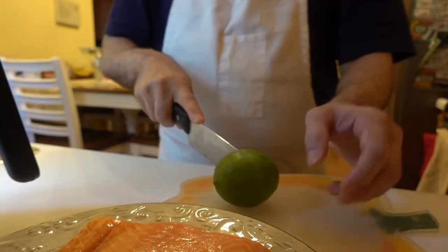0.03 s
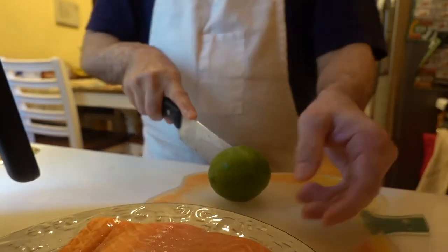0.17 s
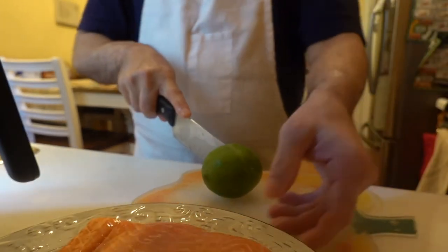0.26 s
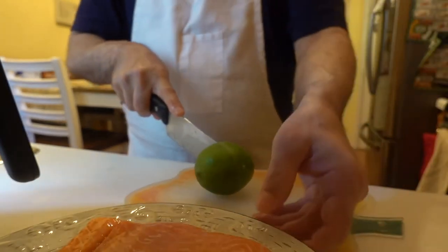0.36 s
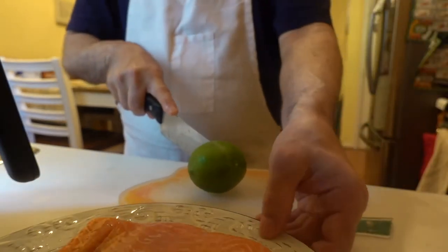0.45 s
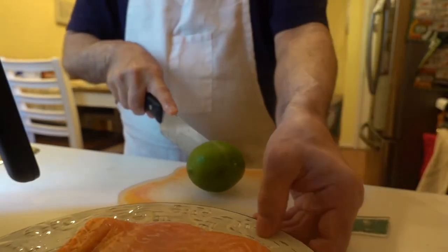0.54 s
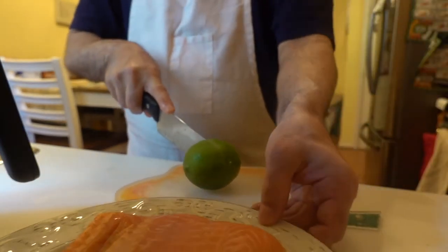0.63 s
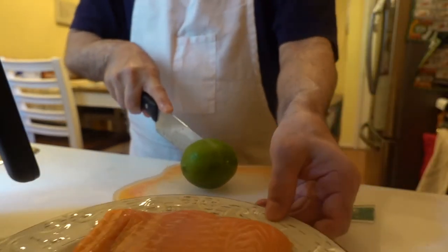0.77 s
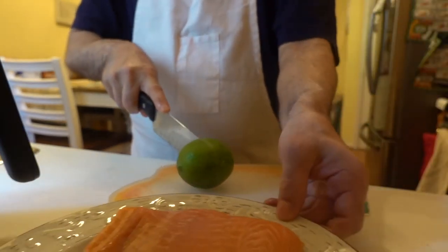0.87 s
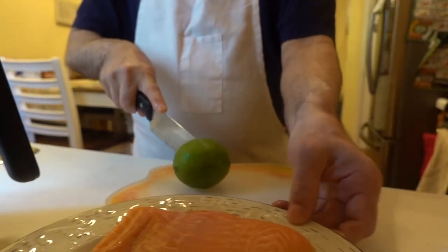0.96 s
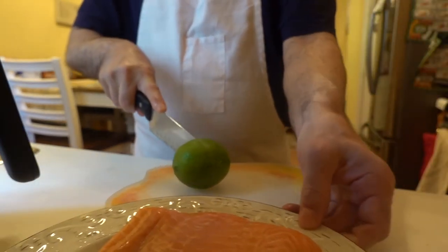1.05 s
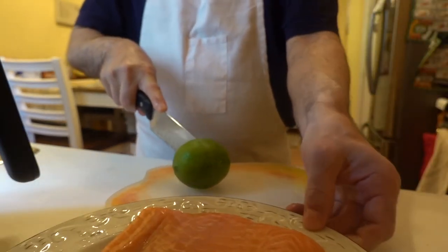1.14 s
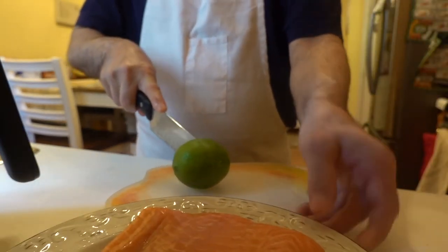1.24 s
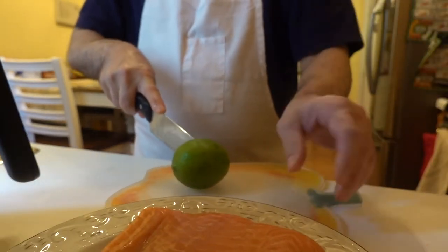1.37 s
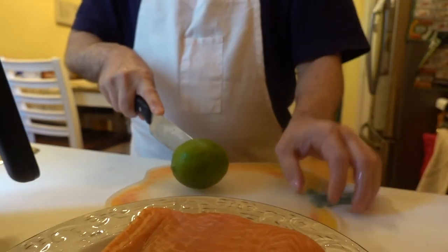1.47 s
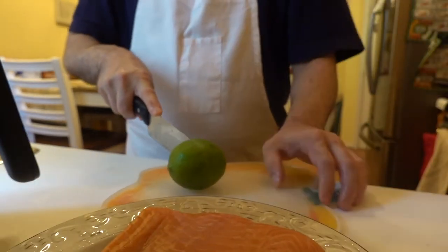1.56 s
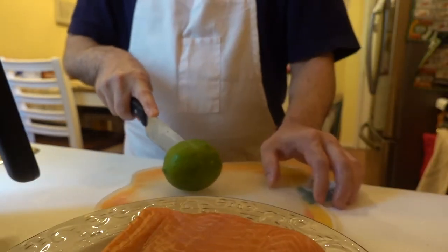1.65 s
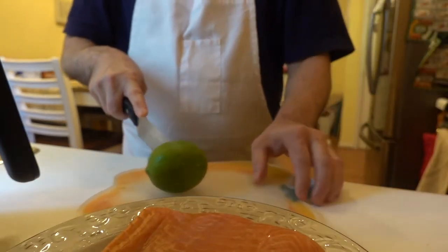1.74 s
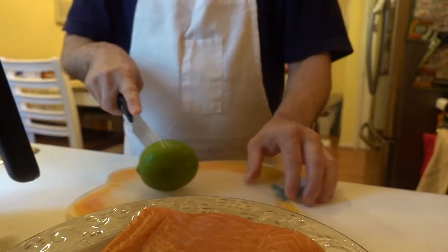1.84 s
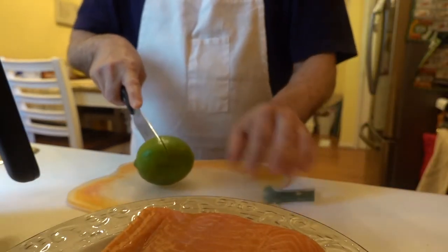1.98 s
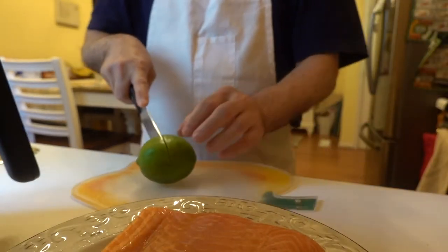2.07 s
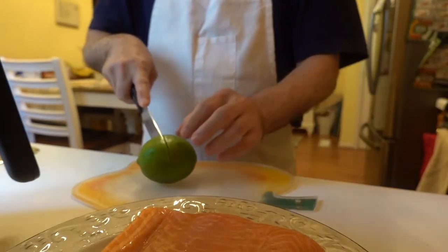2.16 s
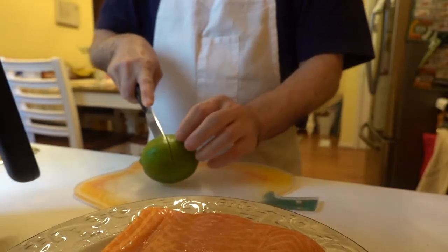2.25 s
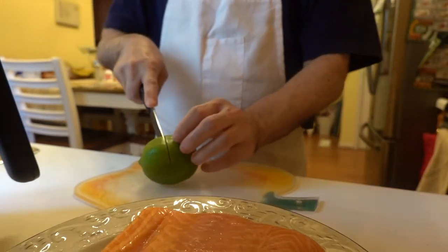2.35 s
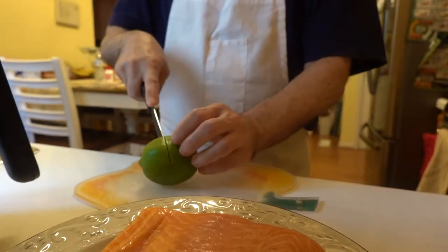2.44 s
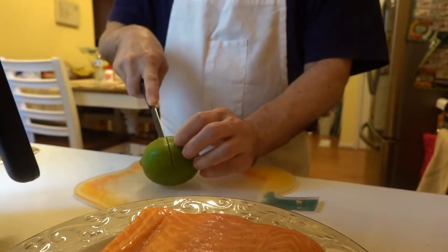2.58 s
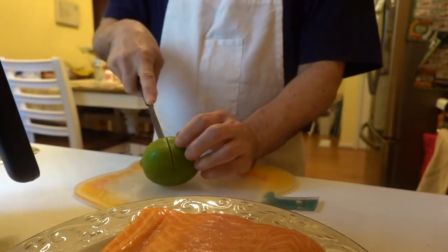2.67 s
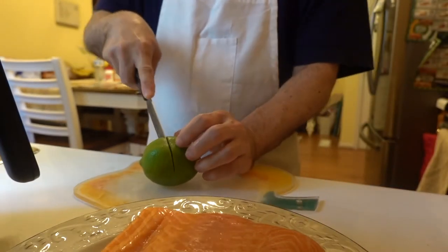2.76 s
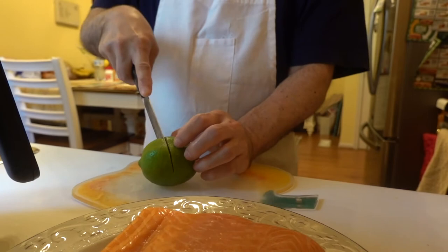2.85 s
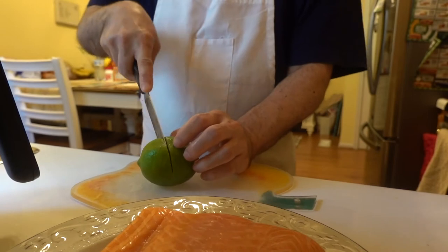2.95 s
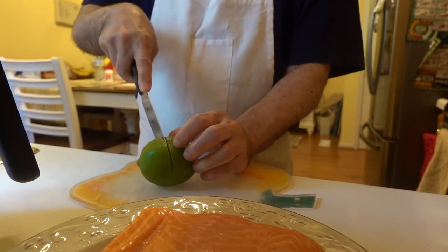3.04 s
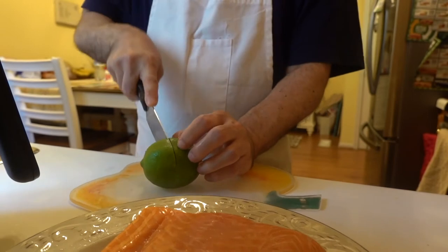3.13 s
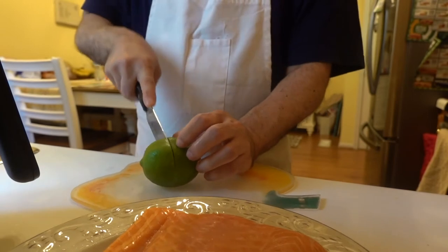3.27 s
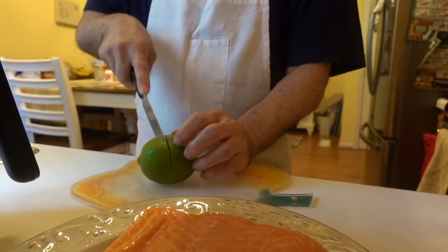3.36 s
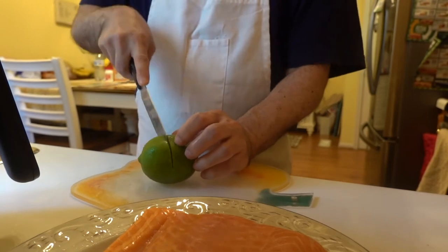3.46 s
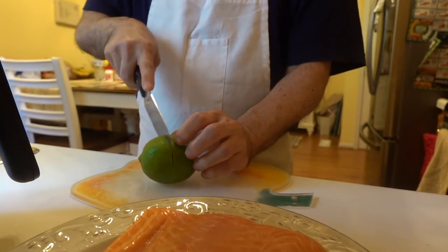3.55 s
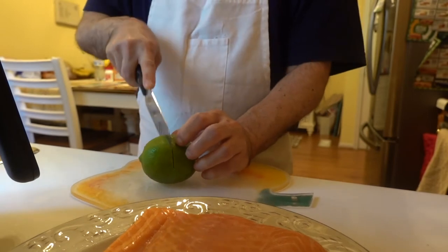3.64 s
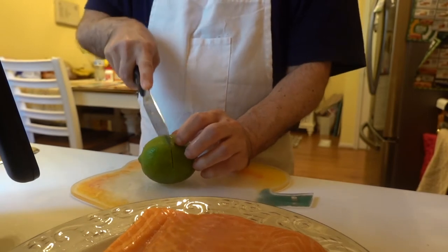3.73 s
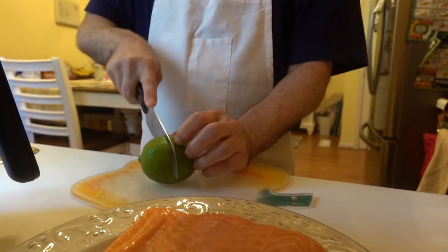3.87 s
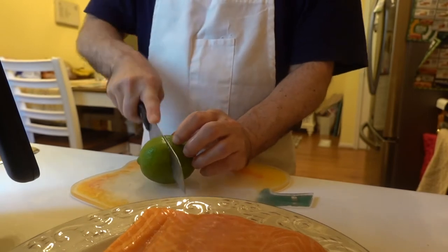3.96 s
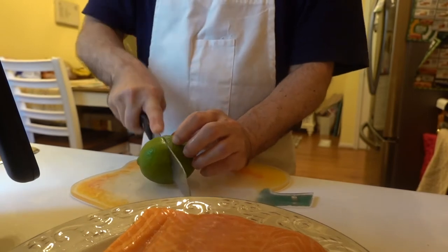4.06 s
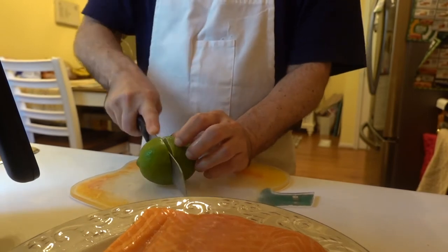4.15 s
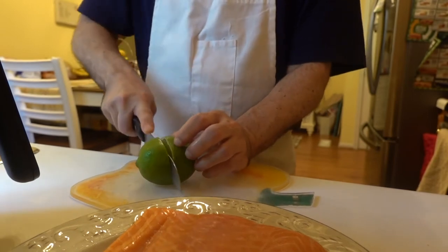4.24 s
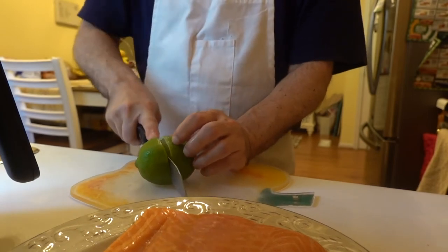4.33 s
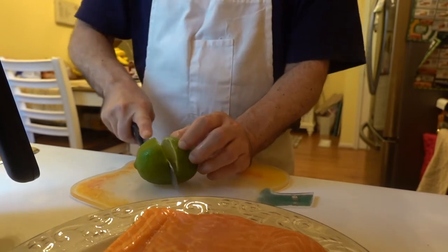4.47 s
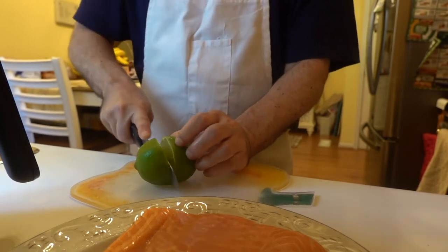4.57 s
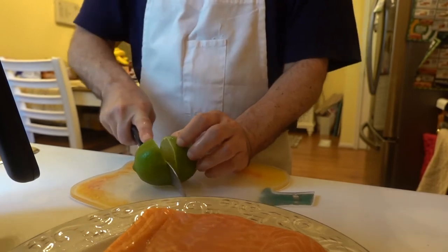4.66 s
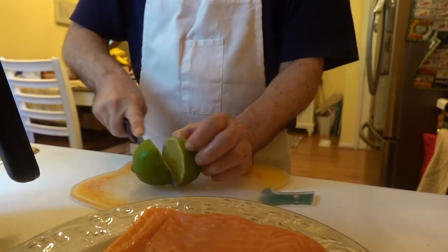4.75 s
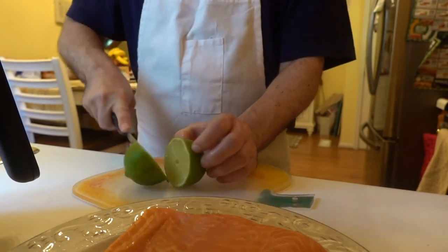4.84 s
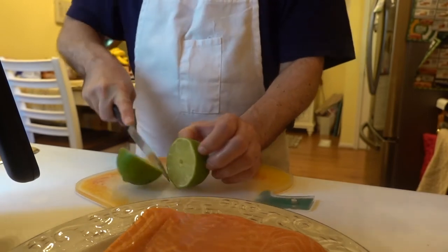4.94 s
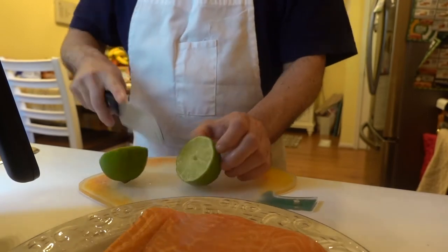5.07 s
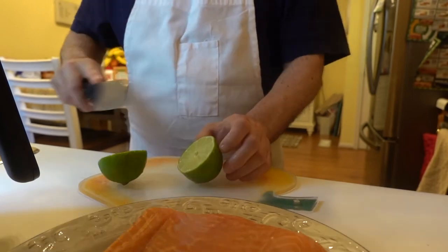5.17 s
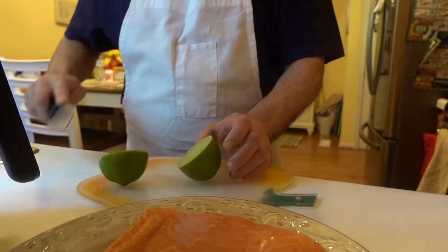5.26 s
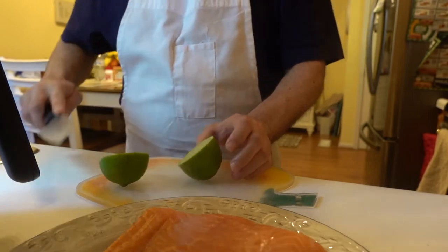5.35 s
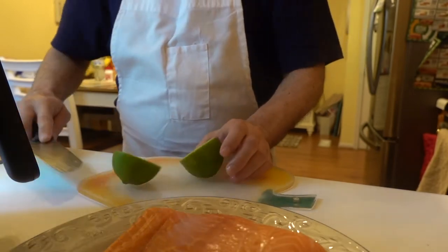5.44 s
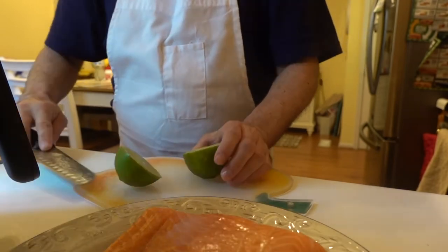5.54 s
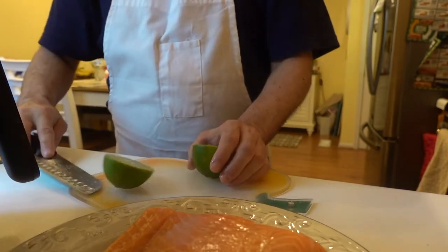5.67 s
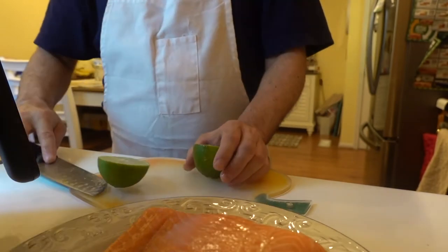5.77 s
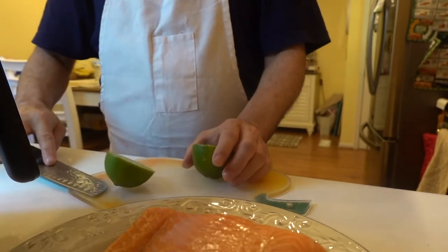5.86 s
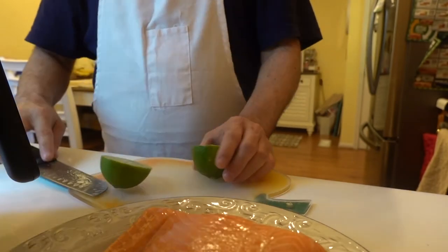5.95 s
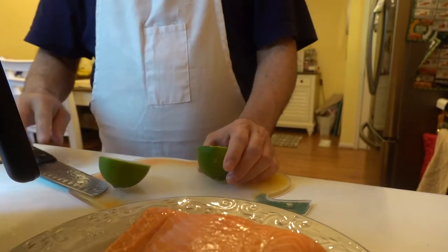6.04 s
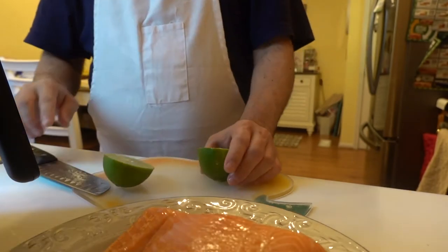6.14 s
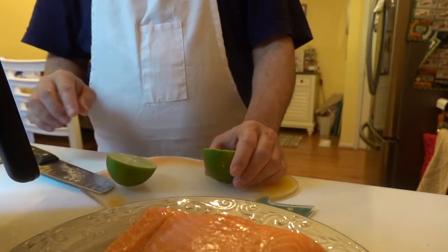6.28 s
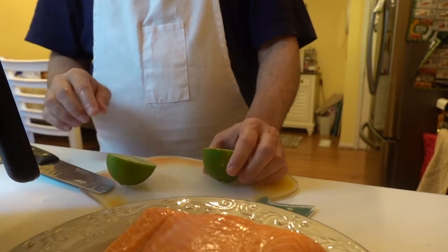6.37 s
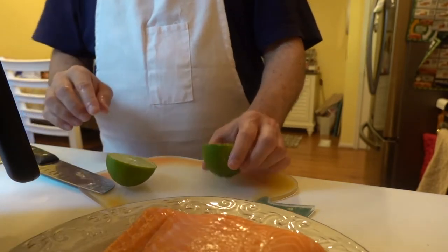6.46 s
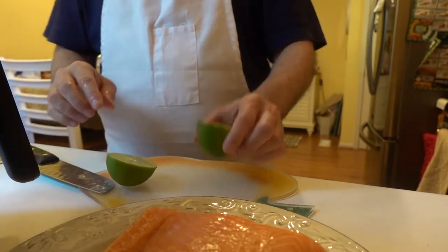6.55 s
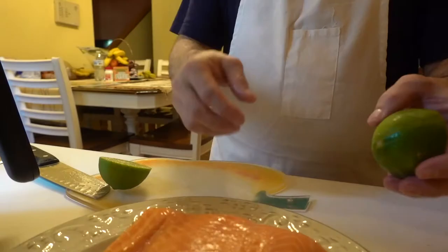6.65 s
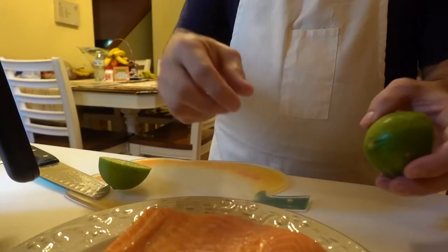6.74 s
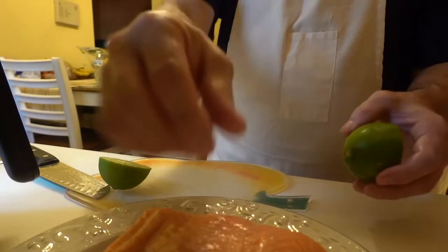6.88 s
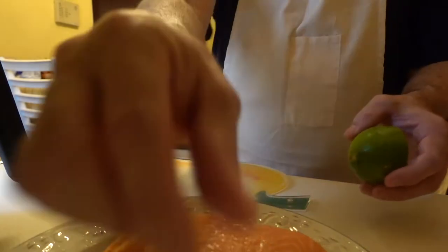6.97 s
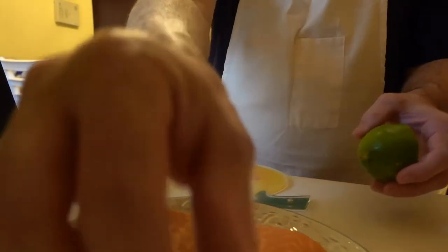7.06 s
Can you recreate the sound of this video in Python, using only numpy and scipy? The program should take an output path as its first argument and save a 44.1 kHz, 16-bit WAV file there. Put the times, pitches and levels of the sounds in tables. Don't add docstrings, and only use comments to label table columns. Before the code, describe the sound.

A quiet kitchen heard very close in stereo, with low appliance rumble, faint hiss and a short lively echo. Around 0.3 s a soft brush begins; from 0.55 to 1.15 s a ceramic plate scrapes over the counter, loudest near 0.77 with a click, and thuds down at 1.0. Small ticks at 1.3, a soft tap at 1.55, fingers brushing around 1.9, a light knock at 2.13. Then near quiet with low counter creaking-weight rumbles until a strong woody knock at 3.35 and a faint settling rub. From 4.1 to 4.95 s short wet rasping strokes cut the lime, with spitting juice and snaps; hard knocks land at 4.13, 4.37, 4.58 and, sharpest, 4.71. A hollow squelch follows at 4.85, and halves tumble in soft thumps at 5.03. A light knock at 5.66, a steely ping at 5.71, then slide and clatter until 5.92. Quiet rumble ends it at 7 s.

```python
import sys
import numpy as np
from scipy import signal
from scipy.fft import rfft, irfft, next_fast_len
from scipy.io import wavfile
from scipy.ndimage import map_coordinates

SR = 44100
rng = np.random.default_rng(int(sys.argv[2]) if len(sys.argv) > 2 else 0)


def generate_wav(sig):
    pcm = np.round(np.clip(np.atleast_2d(sig).T, -1, 1) * 32767).astype(np.int16)
    wavfile.write(sys.argv[1], SR, pcm)


def boost_factor(decibels):
    exponent = np.asarray(decibels, float) / 20
    return 10 ** exponent


N = 313551

# f/Hz, left-right likeness
NEAR_ALIKE = [(100, 1), (300, 0.98), (700, 0.76), (1600, 0.92), (3200, 0.76), (6000, 0.09), (15000, 0.052)]


def unit(x):
    return x / np.sqrt(np.mean(x ** 2) + 1e-20)


def along(points, hz):
    f, v = np.transpose(points)
    return np.interp(np.log(hz + 1), np.log(f + 1), v)


def strokes(rows, power=1.72):
    t, gains = np.arange(N) / SR, 0
    for s, rise, fall, db, *rest in rows:
        away = np.where(t < s, (s - t) / rise, (t - s) / fall)
        layers = np.add(db, [[c] for c in [0, *rest]])
        fade_db = 26.5 * np.minimum(away, 9) ** power
        gains = gains + boost_factor(layers) * boost_factor(-fade_db)
    return gains


def wobble(rate):
    knots = rng.standard_normal(int(N * rate / SR) + 4)
    return map_coordinates(knots, [np.arange(N) * rate / SR])


def filtered(x, response):
    m = next_fast_len(x.shape[-1] + 8192)
    spectrum = rfft(x, m) * response(np.fft.rfftfreq(m, 1 / SR))
    return irfft(spectrum, m)[..., :x.shape[-1]]


def peaks(modes):
    def response(f):
        total = 0
        for k, (centre, width, db) in enumerate(modes):
            damping = 1j * f * width
            total = total + (-1) ** k * boost_factor(db) * damping / (centre * centre - f * f + damping)
        return total
    return response


def colour(spectrum):
    return lambda f: boost_factor(along(spectrum, f))


def ports(mid, side, alike, response=np.ones_like):
    turn = lambda f: np.arccos(np.clip(along(alike, f), 0, 1)) / 2
    mix = lambda f: response(f) * [np.cos(turn(f)), np.sin(turn(f))]
    mid, side = filtered(np.array([mid, side]), mix)
    return np.array([mid + side, mid - side])


def friction(response, alike, grain_db, rough_db):
    grains = boost_factor(grain_db * wobble(900) + rough_db * wobble(45))
    return unit(ports(*grains * rng.standard_normal((2, N)), alike, response))


def ring(spectrum, t, low_hz, high_hz, t60, count, smear=1.67):
    place, size, life, phase = rng.random((4, count, 1))
    hz = low_hz + (high_hz - low_hz) * (np.arange(count)[:, None] + place) / count
    level = along(spectrum, hz) + 5 * size - 60 * t / (t60 * (1.39 + 0.87 * life))
    x = np.sum(boost_factor(level) * np.sin(2 * np.pi * hz * t + smear * phase), axis=0)
    return x / np.abs(x).max()


def burst(t, hz, width, t60):
    band = peaks([(hz, width, 0)])
    x = filtered(boost_factor(-60 * t / t60) * rng.standard_normal(len(t)), lambda f: band(f) ** 2)
    return x / np.abs(x).max()


def add(track, s, x):
    part = track[round(s * SR):][:len(x)]
    part += x[:len(part)]


def background():
    # t/s, level/dB
    rumble_level = [(0.0, -62.5), (0.89, -52), (1.29, -56), (2.0, -58.5), (2.14, -56.5), (2.95, -59),
                    (3.36, -50), (3.56, -57), (3.9, -57.5), (4.02, -48.5), (4.24, -46.5), (5.7, -57),
                    (5.84, -54.5), (6.2, -56), (6.69, -60), (7.11, -57)]
    # t/s, rise/s, fall/s, level/dB
    deep_swells = [
        (.25, .15, 0.17, -69),
        (1.38, 0.055, 0.12, -63),
        (1.9, .2, 0.13, -62),
        (2.65, .12, 0.14, -52),
        (3.28, .08, 0.073, -57),
        (4.1, .15, .2, -62),
        (4.56, 0.11, 0.23, -52.5),
        (5.3, .2, 0.39, -62.5),
        (6.63, 0.09, 0.12, -64),
        (6.99, 0.088, 0.14, -58),
    ]
    # f/Hz, density/dB
    hum_spectrum = [(32, -40), (55, -13), (97, -1), (124, -13), (210, -10.5), (293, -16.5), (321, -25),
                    (427, -24.5), (500, -37), (650, -62.5), (1100, -120)]
    # f/Hz, density/dB
    hiss_spectrum = [(180, -26.5), (300, -5.5), (433, -21.5), (528, -13.5), (774, -9), (1060, -10),
                     (1360, -15), (2400, -14.5), (2740, -18), (3640, -20), (16000, -24.5)]
    # f/Hz, left-right likeness
    far_alike = [(60, 1), (180, 1), (550, 0.46), (1650, 0.43), (4970, 0.16), (15000, -2)]

    hum = boost_factor(np.interp(np.arange(N) / SR, *np.transpose(rumble_level)) + 1.4 * wobble(9.2))
    deep = boost_factor(-15) * hum + strokes(deep_swells)[0]
    rumble = hum * boost_factor(3.0) * friction(colour(hum_spectrum), far_alike, grain_db=-3, rough_db=0.9)
    deep_mode = peaks([(36, 30, 0)])
    rumble += deep * boost_factor(1.0) * friction(lambda f: deep_mode(f) ** 2, far_alike, grain_db=-6.5, rough_db=-5.0)
    hiss = friction(colour(hiss_spectrum), far_alike, grain_db=1.5, rough_db=.8)
    return rumble + boost_factor(-63.5 + 0.45 * wobble(1.0)) * hiss


def kitchen(x):
    # f/Hz, t60/s
    decay = [(150, 0.46), (1000, 0.57), (4000, 0.7), (12000, 0.46)]
    # f/Hz, left-right likeness
    walls_alike = [(150, 1), (600, 0.68), (2000, 0.84), (6000, 0.13)]

    out, step = np.zeros((2, N + SR)), SR // 4
    for start in range(0, N, step):
        hz, t, z = signal.stft(rng.standard_normal((2, SR // 2)), SR, nperseg=256)
        fade = boost_factor(-60 * t / along(decay, hz)[:, None])
        tail = signal.istft(z * fade, SR, nperseg=256)[1]
        wet = signal.fftconvolve(x[None, start:start + step], tail / np.linalg.norm(tail[0]), axes=1)
        out[:, start + 200:][:, :wet.shape[1]] += wet
    return ports(*out[:, :N], walls_alike)


def rubbing():
    # t/s, rise/s, fall/s, level/dB
    brushes = [
        (.33, .32, 0.35, -57.5),
        (1.695, 0.55, 0.028, -69),
        (1.88, 0.29, .26, -52),
        (3.27, .2, 0.21, -62.5),
        (3.35, 0.04, 0.12, -55.5),
        (5.62, 0.11, 0.081, -61.5),
    ]
    # f/Hz, density/dB
    skin_spectrum = [(410, -29), (700, -23), (1020, -20.5), (1210, -10), (2080, -1), (3600, -4.5),
                     (3890, -2.5), (5260, -7), (8650, -5), (16000, -17.5)]
    # t/s, rise/s, fall/s, level/dB, brightness/dB
    drag = [
        (.595, 0.046, 0.057, -43.5, -16),
        (.7, 0.068, 0.054, -37.5, -16),
        (.77, 0.07, 0.11, -32.5, -13.5),
        (.91, 0.091, 0.086, -37, -19),
        (1.05, 0.06, 0.06, -39, -17.5),
        (1.13, 0.068, 0.06, -42, -14.5),
    ]
    # f/Hz, width/Hz, level/dB
    plate_modes = [(386, 55, 7.5), (729, 75, 6.5), (1100, 130, 3.5), (1366, 158, 4.5), (1623, 90, 6.5),
                   (2080, 273, 0.5), (2650, 150, -7), (3110, 196, -2), (3970, 270, -7), (4120, 170, -3),
                   (4640, 310, -15), (5430, 160, -15.5), (7160, 110, -19), (8400, 90, -18)]
    # t/s, rise/s, fall/s, level/dB
    slide = [
        (3.41, .05, 0.27, -42.5),
        (5.73, .015, 0.06, -37),
        (5.77, .05, 0.085, -36.5),
        (5.82, .05, 0.056, -32),
        (5.95, .02, 0.22, -45),
    ]
    # f/Hz, density/dB
    counter_spectrum = [(150, -47), (250, -11.5), (599, -13), (675, -22), (788, -7.5), (1760, -8.5),
                        (1990, -9), (2360, -8.5), (15000, -29)]

    skin = strokes(brushes)[0] * boost_factor(8.0)
    skin = skin * friction(colour(skin_spectrum), NEAR_ALIKE, grain_db=0.5, rough_db=0.5)
    low, bright = strokes(drag, power=3.27)
    low_modes = peaks([p for p in plate_modes if p[0] < 2900])
    high_modes = peaks([p for p in plate_modes if p[0] >= 2900])
    plate = low * boost_factor(.3) * friction(low_modes, NEAR_ALIKE, grain_db=2.5, rough_db=1.5)
    plate += bright * boost_factor(5.0) * friction(high_modes, NEAR_ALIKE, grain_db=-3.0, rough_db=2.0)
    knife = strokes(slide)[0] * boost_factor(-6.5)
    knife = knife * friction(colour(counter_spectrum), NEAR_ALIKE, grain_db=1.5, rough_db=1.5)
    return skin + plate + knife


def thuds():
    # t/s, level/dB, board/dB, edge/dB, thump f/Hz
    blows = [(0.497, -29.5, -3, -7.5, 157), (0.577, -30, -3, -11, 156), (0.744, -27, -9, 6, 258),
             (0.773, -23.5, -17, 4, 171), (1.005, -17.5, 5.5, 1.5, 157), (1.556, -27, -29, -10.5, 107),
             (1.57, -30.5, -19, -21, 151), (2.137, -34, -1, 8, 220), (3.18, -31.5, -27, -17.5, 155),
             (3.213, -30.5, -1, 6.5, 242), (3.352, -12, 6.5, 11, 162), (3.858, -29.5, -15, -3, 158),
             (4.095, -21.5, -7, -10, 159), (4.125, -22, 0.5, -3, 161), (4.366, -25, 5.5, -11, 157),
             (4.577, -29.5, 15, 21.5, 164), (4.71, -28.5, 2, 22.5, 86), (5.767, -28, -24, -10, 110),
             (5.868, -26, 2.5, 10.5, 164), (5.893, -20.5, 6, 2, 162), (6.072, -32, -6, -9, 137),
             (6.95, -37, -25, -31, 190)]
    # t/s, level/dB, board/dB, edge/dB, thump f/Hz
    parting = [
        (5.022, -22.5, -8, -12, 163),
        (5.035, -26.5, 4, 9, 166),
        (5.040, -23.5, 4, 5, 91),
        (5.047, -32.5, 9, 12, 131),
        (5.66, -31, 2.5, 6, 158),
    ]
    # f/Hz, density/dB
    board_spectrum = [(35, -38), (60, -7), (172, -3), (236, -6.5), (435, -5), (584, -22), (743, -11),
                      (911, -37.5), (1340, -21.5), (2060, -35.5), (2260, -17), (2570, -53.5), (5000, -40),
                      (6500, -72), (11000, -120)]
    # t/s, level/dB
    clatter = [
        (5.866, -3),
        (5.872, -5),
        (5.891, -0.5),
        (5.897, -12),
        (5.906, -5),
        (5.911, -14),
        (5.92, -11.5),
    ]
    # f/Hz, density/dB
    handle_spectrum = [(120, -41), (200, -17.5), (271, -16), (344, -10), (591, -7.5), (660, -15.5),
                       (738, -3), (1050, -21.5), (1150, -4), (1510, -8.5), (1920, -16.5), (2400, -15),
                       (3150, -24), (9000, -42), (11700, -65), (19800, -120)]

    track, t = np.zeros(N), np.arange(SR // 3) / SR
    onset = 1 - np.exp(-t / .0008)
    dry_board, wet_board = 0.12, 0.069
    events = [(*b, dry_board) for b in blows] + [(*b, wet_board) for b in parting]
    for s, db, board_db, edge_db, hz, t60 in events:
        blow = 1.03 * boost_factor(-60 * t / t60) * np.sin(2 * np.pi * hz * t)
        blow += 1.16 * ring(board_spectrum, t, 68.8, 279, 0.9 * t60, count=6)
        board = 0.97 * ring(board_spectrum, t, 277.3, 800, 0.81 * t60, count=14, smear=0.82)
        board += .5 * burst(t, 420, 570, t60=0.74 * t60)
        edge = 0.5 * ring(board_spectrum, t, 800, 3000, 0.48 * t60, count=44, smear=0.43)
        edge += 0.41 * burst(t, 1274, 960, t60=0.65 * t60)
        blow += boost_factor(board_db) * board + boost_factor(edge_db) * edge
        add(track, s, onset * boost_factor(db - 2.5) * blow)
    for s, db in clatter:
        bounce = ring(handle_spectrum, t, 248.0, 8500, 0.037, count=90, smear=5.47)
        bounce += 0.17 * burst(t, 4800, 4000, t60=0.034)
        add(track, s, onset * boost_factor(db - 3.5) * bounce)
    return track


def ticks():
    # t/s, level/dB, sharpness/dB, f/Hz
    contacts = [(0.7414, -19, -19, 2290), (1.276, -36, -10, 2050), (1.338, -39.5, -8, 2020),
                (1.546, -35.5, -10.5, 2140), (2.133, -29, -24, 2100), (2.523, -43, -22, 1100),
                (3.2115, -26, -21.5, 2190), (3.855, -50, -19.5, 1760), (4.135, -10.5, -35.5, 2060),
                (4.3518, -27.5, -8.5, 2080), (4.484, -36.5, -18, 2080), (4.5757, -9.5, -26, 1860),
                (4.7115, -12.5, -18.5, 1964), (4.838, -23.5, -17, 915), (5.039, -25.5, -32.5, 1190),
                (5.522, -43, -26, 1060), (5.6597, -23.5, -40, 2080), (5.7105, -13.5, -3, 2354)]
    # t/s, level/dB
    snaps = [(2.83, -50.5), (3.8553, -43.5), (4.094, -36.5), (4.12, -26.5), (4.129, -25), (4.266, -29),
             (4.337, -38.5), (4.352, -29), (4.368, -29), (4.4955, -36.5), (4.569, -26), (4.577, -31.5),
             (4.708, -18), (4.712, -23), (5.71, -23.5), (5.861, -23), (5.8735, -18.5), (5.8953, -24)]

    track, t = np.zeros(N), np.arange(SR // 5) / SR
    onset, life = 1 - np.exp(-t / .0004), 0.04
    for s, db, tip_db, hz in contacts:
        tick = .35 * boost_factor(-110 * t / life) * np.sin(2 * np.pi * hz * t)
        tick += 0.76 * burst(t, hz, 1400, t60=0.73 * life)
        tick += boost_factor(tip_db) * burst(t, 4380, 4000, t60=2.0 * life)
        tick += boost_factor(tip_db - 3.5) * burst(t, 8600, 9000, t60=life)
        add(track, s, onset * boost_factor(db) * tick)
    for s, db in snaps:
        add(track, s, boost_factor(db + 1.0) * burst(t, 9000, 7600, t60=.013))
    return track


def raps():
    # t/s, level/dB, f/Hz
    rap_events = [(.742, -19, 2250), (1.0065, -12.5, 410), (3.3531, -20, 440), (4.1355, -15.5, 1900),
                  (4.367, -24.5, 900), (4.5767, -10.5, 1510), (4.7122, -6, 2115), (5.0401, -20.5, 1237),
                  (5.049, -25.5, 700), (5.044, -19, 1250), (5.9065, -14, 1150)]
    # t/s, level/dB
    laid = [
        (5.711, -27.5),
        (5.8612, -35),
        (5.873, -31.5),
        (5.896, -37.5),
    ]
    # f/Hz, level/dB, t60/s
    blade = [(1820, -1.5, 0.047), (2210, -12.5, 0.3), (2358, -3.5, 0.11), (2735, -12, 0.15),
             (2890, -11, 0.073), (3591, -11, 0.069), (4705, -10.5, 0.19), (5650, -11.5, 0.076),
             (6000, -10.5, 0.076), (6336, -8.5, 0.041), (7122, -16.5, 0.21), (7833, -15.5, 0.11)]

    track, t = np.zeros(N), np.arange(SR // 4) / SR
    for s, db, hz in rap_events:
        level = db + 5 - 60 * t * hz / 5
        add(track, s, (1 - np.exp(-8 * t * hz)) * boost_factor(level) * np.sin(2 * np.pi * hz * t))
    for s, db in laid:
        for hz, mode_db, t60 in blade:
            level = db + mode_db + rng.normal(0, 2) - 60 * t / t60
            add(track, s, boost_factor(level) * np.sin(2 * np.pi * hz * t))
    return track


def knocks():
    firm = lambda f: (1j * f / (1j * f + 75)) ** 2
    soft, hard = filtered(thuds(), firm), ticks() + raps()
    return soft + hard, boost_factor(-9.0) * soft + boost_factor(-7.5) * hard


def sawing():
    # t/s, rise/s, fall/s, rasp/dB, board/dB relative to rasp
    saw = [(3.97, 0.068, 0.48, -65, 11.5), (4.115, 0.044, 0.049, -41.5, 4), (4.16, 0.039, 0.072, -31, -6),
           (4.21, 0.063, 0.1, -35, -12.5), (4.27, 0.024, 0.076, -47, 0), (4.345, 0.023, 0.025, -40.5, 0.5),
           (4.37, 0.025, 0.079, -36.5, 2), (4.493, 0.019, 0.08, -37.5, 4),
           (4.565, 0.042, 0.036, -31.5, -7.5), (4.59, 0.026, 0.022, -34, -5),
           (4.68, 0.057, 0.073, -30.5, -9.5), (4.715, 0.029, 0.033, -30.5, -7),
           (4.82, 0.034, 0.056, -42, -3), (4.87, 0.061, 0.079, -35.5, -5), (4.92, 0.063, 0.066, -41, -10)]
    # f/Hz, width/Hz, level/dB
    slots = [
        [(1260, 500, 0.5), (2080, 590, 12), (3310, 990, -17.5), (4200, 1100, -14)],
        [(1290, 440, -4.5), (2310, 880, 15.5), (3400, 500, -6), (4170, 800, 2.5)],
    ]
    # t/s, f/Hz
    cut = [
        (4.08, 1970),
        (4.274, 2050),
        (4.408, 1700),
        (4.474, 1970),
        (4.55, 1900),
        (4.676, 2210),
        (4.768, 2080),
        (4.82, 2300),
        (5.0, 2200),
    ]
    # f/Hz, width/Hz, level/dB
    pulp = [(577, 470, -2), (733, 167, 5), (1070, 990, -3.5)]
    # t/s, rise/s, fall/s, level/dB, f/Hz
    hollow = [
        (4.844, .01, .04, -29.5, 980),
        (4.88, 0.023, .04, -35, 820),
        (4.92, 0.033, 0.035, -43.5, 1180),
    ]
    # t/s, rise/s, fall/s, level/dB
    squirts = [
        (3.97, 0.1, 0.24, -59),
        (4.12, 0.083, 0.078, -45),
        (4.27, 0.052, .06, -47.5),
        (4.368, 0.044, 0.053, -39),
        (4.496, 0.04, 0.083, -47.5),
        (4.56, 0.024, 0.05, -43.5),
        (4.692, 0.07, 0.044, -40.5),
        (4.87, 0.14, 0.19, -47),
    ]
    # f/Hz, density/dB
    juice_spectrum = [(1760, -33), (3000, -2), (3570, -2.5), (4030, -6), (6090, -8), (11000, -2),
                      (16000, -18)]

    (rasp, board), juice = strokes(saw), strokes(squirts)[0]
    slot_hz = np.interp(np.arange(N) / SR, *np.transpose(cut))
    opening = np.clip((slot_hz - 1800) / 600, 0, 1)
    narrow, wide = [friction(lambda f: peaks(slot)(f) ** 2, NEAR_ALIKE, grain_db=2.5, rough_db=.8)
                    for slot in slots]
    out = rasp * boost_factor(-0.5) * (np.sqrt(1 - opening) * narrow + np.sqrt(opening) * wide)
    out += board * boost_factor(-1.9) * friction(lambda f: peaks(pulp)(f) ** 2, NEAR_ALIKE, grain_db=0.0, rough_db=-2.5)
    for *stroke, hz in hollow:
        gap = friction(lambda f: peaks([(hz, 380, 0)])(f) ** 2, NEAR_ALIKE, grain_db=-0.5, rough_db=-1.5)
        out += strokes([stroke])[0] * gap
    spray = friction(colour(juice_spectrum), NEAR_ALIKE, grain_db=1.5, rough_db=3.0)
    return out + juice * boost_factor(-0.55) * spray


def scene():
    hits, far_hits = knocks()
    rubs = rubbing() + sawing()
    scatter = lambda f: np.exp(-2j * np.pi * f * .0009)
    near = ports(hits, filtered(hits, scatter), NEAR_ALIKE)
    return near + rubs + kitchen(far_hits + boost_factor(-10.5) * rubs.mean(axis=0)) + background()


def band_limit(x):
    return signal.sosfilt(signal.butter(12, 16500, fs=SR, output="sos"), x)


def record(dry):
    # f/Hz, left minus right/dB
    tilt = [(60, -0.5), (180, 0), (550, 2), (1650, 3.5), (4970, 4.5), (15000, 8.5)]

    def response(f):
        band = (f < 15900) * f / (f + 15)
        balance = boost_factor(along(tilt, f) * np.array([[.5], [-.5]]))
        delay = np.exp(-2j * np.pi * f * np.array([[4.5e-5], [0]]))
        return band * balance * delay
    return band_limit(filtered(dry, response))


dry = scene()
out = record(dry)
generate_wav(out)
```